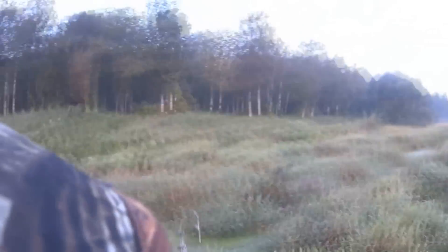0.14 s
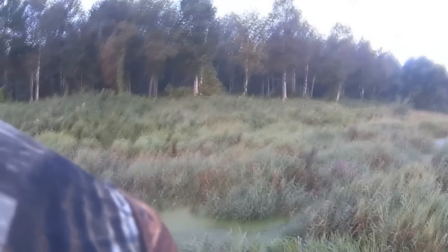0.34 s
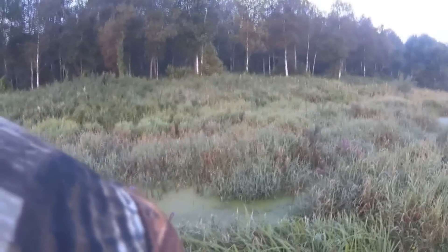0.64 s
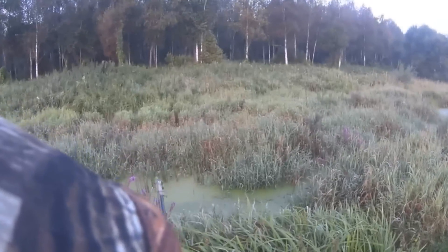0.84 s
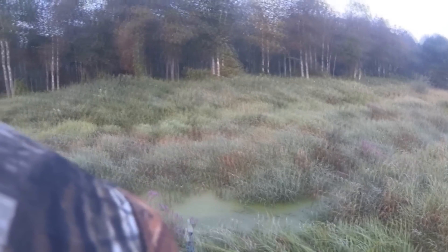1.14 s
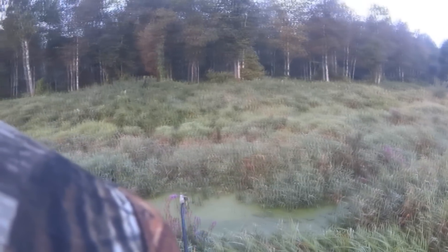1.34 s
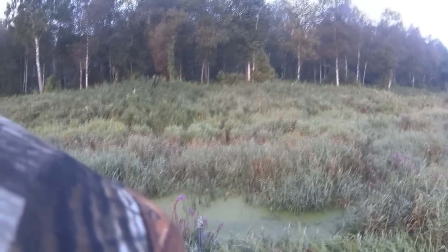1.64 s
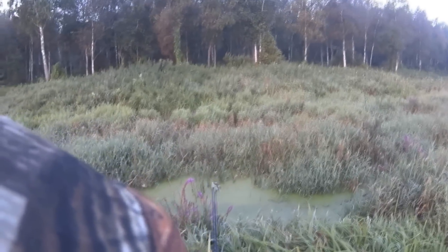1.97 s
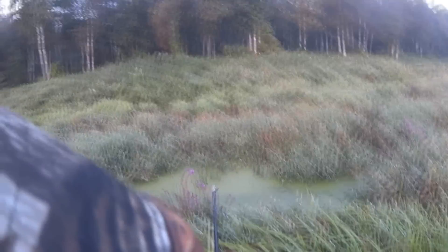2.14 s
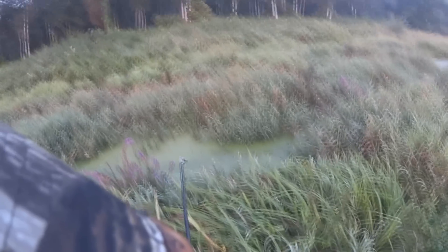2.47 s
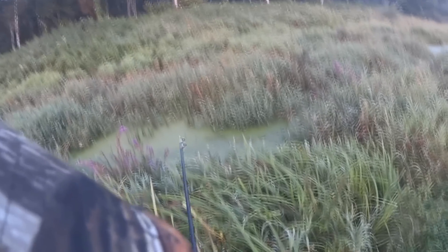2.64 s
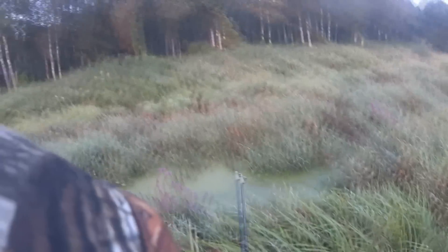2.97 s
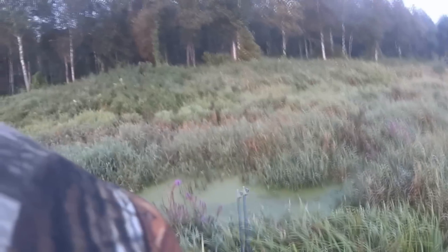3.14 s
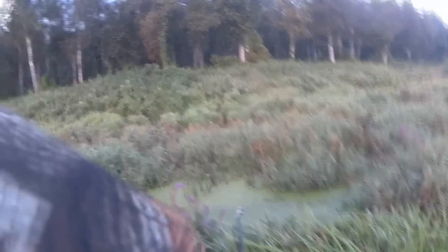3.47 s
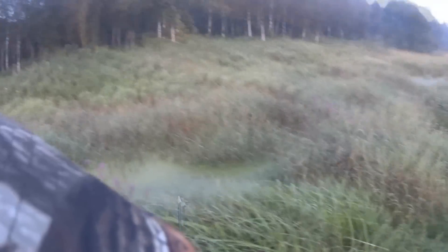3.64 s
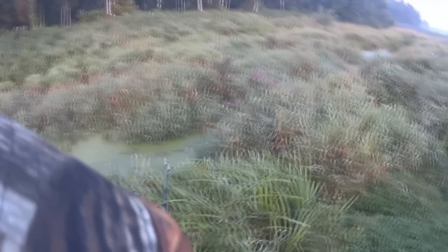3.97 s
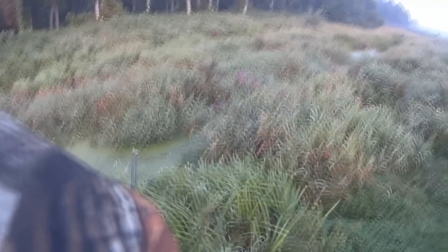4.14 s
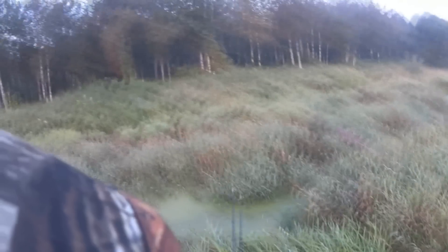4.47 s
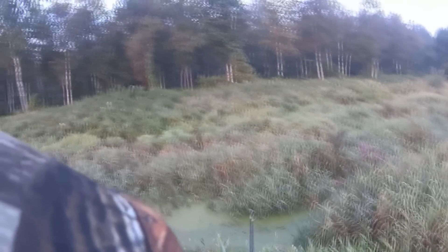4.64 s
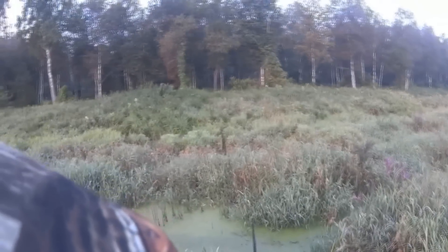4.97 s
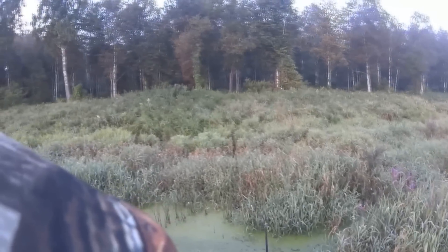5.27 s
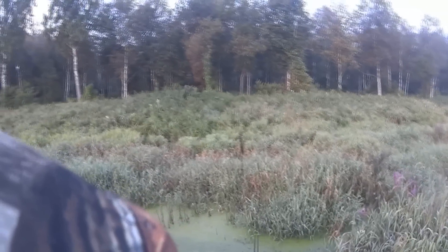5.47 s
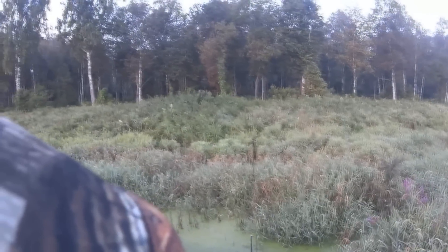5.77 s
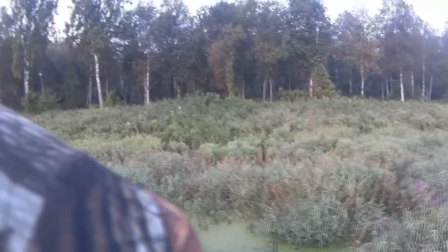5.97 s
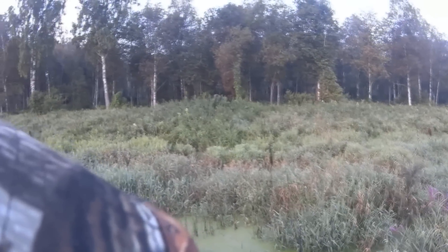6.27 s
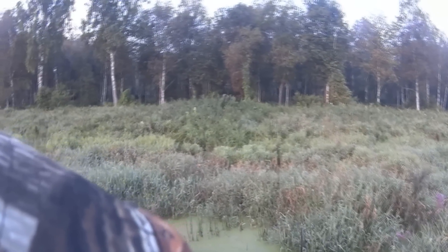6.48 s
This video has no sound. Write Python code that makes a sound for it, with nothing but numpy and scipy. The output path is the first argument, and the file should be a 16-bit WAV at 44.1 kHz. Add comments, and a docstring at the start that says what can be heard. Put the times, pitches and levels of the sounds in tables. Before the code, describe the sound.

Dry cloth and tall grass rub close against a small body camera in short irregular swishes, with sharp snaps and faint squeaks over a quiet outdoor hush.

```python
"""Someone shifts about in tall marsh grass, wearing a small camera. From the start, shaped noise gives the hush
of open country, with low buffeting of air; stick-slip friction of cloth and blades creeps faintly on the case.
From half a second on, short strokes swell this rustle, with decaying snaps, modal knocks and slow shoves of air.
Gliding tones make thin squeaks from about 3 s; coloured slips make the case groan under heavy drags from 4 s.
The rubbing is firmer from then on, and strokes go on until shortly before the end."""
import sys
import numpy as np
from scipy import signal
from scipy.fft import rfft, irfft
from scipy.io import wavfile
from scipy.ndimage import uniform_filter1d

SR = 44100
rng = np.random.default_rng(int(sys.argv[2]) if len(sys.argv) > 2 else 0)


def master(y):
    """Save y as 16-bit WAV."""
    cut = np.clip(np.atleast_2d(y).T, -1, 1)
    pcm = np.round(cut * 32767)  # scale
    wavfile.write(sys.argv[1], SR, pcm.astype(np.int16))


N = 291475  # length in samples


def amp(db):
    """Decibel law: level to amplitude."""
    return 10 ** (np.asarray(db) / 20)


def evened(x):
    """Normalisation to an rms of 1."""
    return x / np.sqrt(np.mean(x ** 2) + 1e-20)


def read(points, hz):
    """Interpolation of a spectrum table on a log-frequency axis."""
    f, value = np.transpose(points)
    return np.interp(np.log(hz + 1), np.log(f + 1), value)


def follow(rows):
    """Linear interpolation in time: the columns of a curve table, sample by sample."""
    s, *columns = np.transpose(rows)
    return [np.interp(np.arange(N) / SR, s, c) for c in columns]


def bins(size):
    """Frequencies in Hz of a real Fourier transform."""
    return np.fft.rfftfreq(size, 1 / SR)


def add(mix, s, sound):
    """Superposition: a sound is added to the mix from s seconds on."""
    part = mix[max(round(s * SR), 0):][:len(sound)]
    part += sound[:len(part)]


def wander(size):
    """Low-passed noise: smooth chance of rms 1 that changes over size samples."""
    noise = rng.standard_normal(N)
    return evened(uniform_filter1d(uniform_filter1d(noise, size), size))


def colour(x, db):
    """Minimum-phase filtering with the gain db(Hz): clicks ring after they start, never before."""
    size = 2048
    hz = abs(np.fft.fftfreq(size, 1 / SR))
    log_gain = np.log(amp(np.maximum(db(hz), -100)))
    # the Hilbert transform of the log gain gives the minimum phase
    taps = np.fft.ifft(np.exp(np.conj(signal.hilbert(log_gain)))).real
    return signal.fftconvolve(x, taps[None], axes=1)[:, :x.shape[1]]


def noise_pair(spectrum):
    """Spectral shaping: two unrelated noises with the given spectrum."""
    return irfft(rfft(rng.standard_normal((2, N))) * amp(read(spectrum, bins(N))), N)


def ports(pair, same, lead, balance):
    """Interaural-style coherence: two unrelated signals become the partly alike sound at the two ports."""
    hz, (a, b) = bins(N), rfft(pair)
    likeness = np.clip(read(same, hz), -1, 1)
    side = amp(read(balance, hz) / 2)
    right = likeness * a + np.sqrt(1 - likeness ** 2) * b
    right = right * np.exp(-1j * read(lead, hz))
    return irfft(np.array([a * side, right / side]), N)


# Likeness of the two ports for near sounds. Each row: frequency in Hz, likeness from 0 to 1.
NEAR_SAME = [(400, .6), (1400, .7), (2050, .97), (2300, .9), (2600, .58), (3200, .83), (3900, .8),
             (5000, .96), (6200, .91), (6900, .7), (7500, .85), (10500, .83)]
# Level of left over right for near sounds. Each row: frequency in Hz, difference in dB.
NEAR_BALANCE = [(1900, 0), (2350, 3), (3000, -1), (4000, -3), (4350, 2), (6300, -1), (7000, 4), (8200, -14),
                (8900, 1.5), (9350, 0.5), (10200, -3)]
# Phase lead of left for near sounds. Each row: frequency in Hz, lead in radians.
NEAR_LEAD = [(500, -2.8), (1050, -2.4), (1450, -.3), (2200, -.25), (2550, -.7), (3200, -.1), (4300, .1),
             (6200, -.35), (9200, -.6), (9800, -.1)]


def near_ports(pair):
    """Near-field reception: likeness, level and phase between the ports vary with frequency."""
    return ports(pair, NEAR_SAME, NEAR_LEAD, NEAR_BALANCE)


# Resonances of the case and the dips between them. Each row: frequency in Hz, width in Hz, lift in dB.
CASE = [(550, 270, 1), (815, 81, 4.5), (1230, 54, 11), (1784, 42, 15.5), (1805, 130, -16), (2260, 37, 2),
        (2430, 29, -4), (2820, 30, -6.5), (3240, 68, -7.5), (3987, 113, 8), (4310, 150, 18),
        (4300, 130, -22.5), (6000, 50, 7.5), (7500, 400, 0), (10100, 230, -1)]


def case_db(hz):
    """Resonance: each mode of the case lifts or dips the spectrum in dB by a bell-shaped curve."""
    return sum(db / (1 + (2 * (hz - f) / width) ** 2) for f, width, db in CASE)


# Spectrum of the hush. Each row: frequency in Hz, relative density in dB per Hz.
HUSH = [(53, -27), (90, -9), (246, -2.5), (659, -1), (1180, -3.5), (1700, -3), (1910, -5), (3710, -10.5),
        (4020, -22), (4280, -7.5), (5440, -17.5), (6020, -10), (7660, -16), (11000, -20.5), (14300, -57.5),
        (22000, -120)]
# Correlation of the hush at the two ports. Each row: frequency in Hz, likeness from -1 to 1.
HUSH_SAME = [(60, -0.22), (120, 0.79), (220, -0.085), (430, -0.38), (840, -0.66), (1620, -0.4),
             (3120, -0.32), (6040, -0.56), (11700, -0.35)]
HUSH_DB = -58


def hush():
    """Diffuse-field noise: distant air over the marsh and the faint hiss of the microphone."""
    heard = ports(noise_pair(HUSH), HUSH_SAME, lead=[(0, 0)], balance=[(0, 0)])
    return amp(HUSH_DB + 0.57 * wander(size=4000)) * evened(heard)


# Strokes of cloth and blades across the case. Each row: moment of fastest sliding in seconds, speeding up
# in seconds, slowing down in seconds, scrape level in dB, case ring and fizz in dB relative to the scrape.
STROKES = [ (.556, .09, .023, -62, 11.5, -14), (.719, 0.087, .06, -43, -2.5, -11.5),
           (.766, 0.065, 0.063, -39, -0.5, -4.5), (0.841, 0.043, 0.041, -39.5, -8, -7),
           (.901, 0.043, .028, -44.5, -10, -7.5), (.939, .02, .035, -47.5, -13, -7.5),
           (1.046, 0.036, 0.069, -47, -6, -6), (1.115, 0.025, 0.078, -46, -4, -7),
           (1.2, .018, 0.056, -48.5, -10, -5), (1.3, 0.072, 0.08, -39, -10.5, -5.5),
           (1.371, 0.043, 0.11, -41, -6.5, -7), (1.488, 0.046, 0.048, -46.5, 2, -12.5),
           (1.76, 0.078, 0.048, -49, 0.5, -4.5), (1.835, 0.089, .125, -40.5, -3, -8),
           (1.925, 0.022, 0.078, -48, 3.5, -5), (2.1, 0.049, 0.097, -45.5, -0.5, -11),
           (2.207, .015, 0.024, -58, 4, -2.5), (2.271, .021, 0.047, -45, -1.5, -8.5),
           (2.367, .1, 0.13, -45, -2, -10), (2.955, 0.014, .06, -62, 8.5, -8),
           (3.206, 0.076, 0.077, -45.5, -6, -7.5), (3.263, .042, .065, -39, -9.5, -13),
           (3.342, 0.068, 0.058, -51, -7, -9), (3.402, 0.049, .037, -44.5, -9.5, -9.5),
           (3.543, 0.04, 0.037, -35.5, -6.5, -10), (3.935, .044, .02, -63, 6, -8),
           (4.114, 0.057, .05, -50, 3, -9), (4.18, 0.079, 0.15, -43, 2, -10),
           (4.292, 0.14, 0.11, -40, 1, -10), (4.864, .085, 0.082, -38, 0, -11),
           (4.925, .09, 0.055, -36.5, -4, -8), (5.028, 0.12, 0.13, -34.5, -1.5, -7),
           (5.683, 0.066, .07, -48, -0.5, -6), (5.716, .05, .04, -41.5, 4.5, -6),
           (5.815, 0.021, 0.031, -49, 5.5, -5.5), (6.108, 0.031, 0.026, -42, 3.5, -9),
           (6.42, 0.081, 0.11, -54, 7, -6.5), (6.487, .043, 0.067, -49.5, 7.5, -8),
           (6.578, .075, .11, -42, 5, -8.5)]
# Faint creep of the cloth between strokes. Each row: time in seconds, scrape level in dB.
CREEP = [(0, -61), (.12, -74), (.35, -77), (.47, -62.5), (.65, -67), (1.0, -73.5), (2.02, -68.5),
         (2.47, -63.5), (2.75, -62), (3.05, -75.5), (3.62, -75.5), (3.85, -64), (4.57, -66.5), (4.68, -59),
         (5.27, -70), (5.39, -59.5), (5.55, -68.5), (5.87, -67), (6.17, -66), (6.3, -75.5)]
CREEP_RING_DB, CREEP_FIZZ_DB = 1.7, -3.5  # relative to the scrape
SPEED_LAW = 2.05  # the rustle grows as this power of the sliding speed


def sliding():
    """Power law of friction noise: strokes arch in speed over the creep, driving scrape, ring and fizz."""
    t = np.arange(N) / SR
    creep_db = follow(CREEP)[0] + np.array([[0], [CREEP_RING_DB], [CREEP_FIZZ_DB]])
    power = amp(creep_db) ** 2
    for s, rise_s, fall_s, db, ring_db, fizz_db in STROKES:
        on = (t > s - rise_s) & (t < s + fall_s)
        phase = np.interp(t[on], [s - rise_s, s, s + fall_s], [-1, 0, 1])
        speed = np.cos(np.pi / 2 * phase)
        peak = amp(db + np.array([[0], [ring_db], [fizz_db]]))
        power[:, on] += (peak * speed ** SPEED_LAW) ** 2
    return np.sqrt(power)


# Spectrum of the buffeting. Each row: frequency in Hz, relative density in dB per Hz.
BUFFET_COLOUR = [(5, 2.5), (15, -0.5), (30, -0.5), (65, -8), (100, -15.5), (200, -39), (600, -85)]
# at rest, and added by a lasting scrape of 0 dB; the stir is averaged over the linger time
BUFFET_REST_DB, BUFFET_STIR_DB, BUFFET_LINGER_S = -69.5, -34, 0.22


def buffet(unlike=0.16):
    """Pressure fluctuation: low lumps of air, nearly alike at both ports, swell around the strokes."""
    shared, own = noise_pair(BUFFET_COLOUR)
    stir = uniform_filter1d(sliding()[0], max(round(BUFFET_LINGER_S * SR), 1))
    level = amp(BUFFET_REST_DB) + amp(BUFFET_STIR_DB) * stir
    return level * evened(shared + unlike * np.array([own, -own]))


# How firmly the cloth presses. Each row: time in seconds, share of firm rub from 0 to 1.
PRESSURE = [(0, 0.04), (3.6, 0.83), (4.0, 0.95), (6.6, 1)]


def firmness():
    """Contact pressure: the share of firm rub against light swish, from 0 to 1."""
    return np.clip(follow(PRESSURE)[0], 0, 1)


def slips(per_s, spread_db, smooth, clump_db, smear_s=0.0041, count=6):
    """Stick-slip: fibres let go in uneven clumps over a smooth sliding hiss."""
    size = amp(spread_db * np.minimum(rng.exponential(1, N), 4)) * (rng.random(N) < per_s / SR)
    clicks = size * rng.choice([-1, 1], (2, N))
    place = rng.integers(0, count, N)
    t = np.arange(1024) / SR
    # from each of a few places on the cloth a slip arrives smeared in time, its spectrum unchanged
    paths = rfft(rng.standard_normal((count, len(t))) * amp(-60 * t / smear_s))
    paths = np.roll(irfft(paths / abs(paths)), len(t) // 8, axis=1)
    grains = np.zeros((2, N))
    for k, path in enumerate(paths):
        grains += signal.oaconvolve(clicks * (place == k), path[None], axes=1)[:, :N]
    hiss = smooth * rng.standard_normal((2, N))
    return (evened(grains) + hiss) * amp(clump_db * wander(size=200))


def shifting(pair, patchy_db):
    """Time-varying filtering: the contact point moves, so narrow resonances come and go."""
    z = signal.stft(pair, nperseg=512, noverlap=384)[2]
    patches = rng.standard_normal(z.shape[1:])
    patches = uniform_filter1d(patches, size=3, axis=0)  # across frequency
    patches = evened(uniform_filter1d(patches, size=18, axis=1))  # across time
    return signal.istft(z * amp(patchy_db * patches), nperseg=512, noverlap=384)[1][:, :N]


# Colour of a light swish. Each row: frequency in Hz, relative density in dB per Hz.
SWISH = [(650, -57), (1100, -48), (1180, -16.5), (1330, -20), (1650, -0.5), (2270, -2), (2910, -7),
         (3920, -0.5), (4620, -30.5), (5040, -0.5), (6050, -3.5), (6600, -7), (8990, -23), (10100, -12.5),
         (11000, -26.5), (14300, -79), (22000, -120)]
# Colour of a firmer rub. Each row: frequency in Hz, relative density in dB per Hz.
RUB = [(650, -59), (1100, -26.5), (1650, -8.5), (1800, -7.5), (2220, -3.5), (2860, -2.5), (3460, -2.5),
       (3920, -10), (4280, -0.5), (6050, -8), (6670, -12), (7270, -8.5), (7930, -19.5), (10300, -11.5),
       (11000, -19), (14300, -70), (22000, -120)]
JUDDER_DB, JUDDER_S = 1.2, 0.0074  # the slide is never quite even


def rustle():
    """Friction-driven resonance: the same slips feed case ring, scrape and fizz; strokes set how strongly."""
    judder = amp(JUDDER_DB * wander(size=max(round(JUDDER_S * SR), 1)))
    scrape_gain, ring_gain, fizz_gain = sliding() * judder
    # a light touch crackles; pressed cloth slides evenly
    loose = slips(per_s=1200, spread_db=2.0, smooth=0.58, clump_db=2.0, smear_s=0.0031)
    dense = slips(per_s=4000, spread_db=2.5, smooth=1.0, clump_db=0.53, smear_s=0.0034)
    loose = shifting(loose, patchy_db=5.0)
    dense = shifting(dense, patchy_db=2.8)
    swish = evened(colour(loose, lambda hz: read(SWISH, np.maximum(hz, 1200)) + case_db(hz)))
    rub = evened(colour(dense, lambda hz: read(RUB, np.maximum(hz, 1150)) + case_db(hz)))
    firm = firmness()
    z = rfft(near_ports(np.sqrt(1 - firm) * swish + np.sqrt(firm) * rub))
    hz = bins(N)
    low = 1 / (1 + (hz / 2800) ** 20)
    high = 1 - 1 / (1 + (hz / 7000) ** 20)
    # small things radiate little bass
    thin = amp(read([(100, -37), (400, -2), (800, -2), (1200, -0.5), (1550, 2.0), (1950, 9.0)], hz))
    bands = (low * thin, 1 - low - high, high)
    ring, scrape, fizz = (evened(irfft(z * band, N)) for band in bands)
    return ring_gain * ring + scrape_gain * scrape + fizz_gain * fizz


CATCHES_PER_S, CATCH_SPREAD_DB = 90, 3.5
CATCH_DB = -10.5  # relative to the scrape, at the lightest touch
CATCH_LOW_HZ = 4260  # the ticks thin out below this


def catches():
    """Impulsive noise: chance ticks, too light to ring the case, follow the scrape, fainter when pressed."""
    size = amp(CATCH_SPREAD_DB * np.minimum(rng.exponential(1, N), 3))
    size = size * (rng.random(N) < CATCHES_PER_S / SR)
    clicks = size * rng.choice([-1, 1], (2, N))
    ticks = colour(clicks, lambda hz: read(SWISH, hz) - 20 * np.log10(1 + (CATCH_LOW_HZ / (hz + 1)) ** 4))
    light = 1 - .5 * firmness()
    return amp(CATCH_DB) * light * sliding()[0] * evened(near_ports(ticks))


STRANDS_PER_S, STRAND_S = 36, 0.043  # mean length in seconds
STRAND_GLIDE = 0.142  # range of the pitch change from start to end, as a share of the pitch
STRAND_DB = -14  # relative to the scrape, under full pressure
STRAND_LOW_HZ, STRAND_HIGH_HZ = 1900, 5620


def strands():
    """Frequency glide: single threads sing briefly, up or down, stronger with pressure and scrape."""
    out = np.zeros(N)
    for place, pitch, glide, size in rng.random((round(STRANDS_PER_S * N / SR), 4)):
        u = np.linspace(-1, 1, round(STRAND_S * (.5 + size) * SR))
        middle_hz = STRAND_LOW_HZ * (STRAND_HIGH_HZ / STRAND_LOW_HZ) ** pitch
        hz = middle_hz * (1 + STRAND_GLIDE * (glide - .5) * u)
        tone = np.sin(2 * np.pi * np.cumsum(hz) / SR)
        add(out, place * N / SR, size * (1 - u ** 2) * tone)
    return amp(STRAND_DB) * firmness() * sliding()[0] * evened(out)


# Snaps where something catches. Each row: start in seconds, level in dB, case ring (lift below about 2900 Hz)
# in dB, die-away time t60 in seconds.
SNAPS = [(0.4758, -34, -3, .02), (0.482, -30.5, 9, 0.027), (0.533, -35.5, 9, 0.027), (0.547, -35, -9, .057),
         (0.5905, -40.5, 14, 0.042), (0.831, -22.5, -12, 0.029), (0.847, -32, -26, 0.014),
         (0.931, -43, -15, .035), (1.035, -26.5, -12, 0.044), (1.101, -42, 9, 0.023),
         (1.192, -34, -38, 0.051), (1.249, -36.5, 5, 0.079), (1.355, -25.5, -18, 0.035),
         (1.394, -31, -11, .02), (1.47, -36.5, -3, .07), (1.746, -39, 18, .03), (2.074, -38.5, -13, 0.034),
         (2.266, -40, 4.5, .035), (2.4097, -17.5, 3, 0.065), (2.412, -16, 2, 0.026),
         (2.4425, -38.5, -32, 0.0087), (3.243, -30.5, -10, 0.02), (3.832, -49, -22, .006),
         (3.94, -38, -7, 0.0049), (4.13, -33, -33, 0.0086), (4.169, -31, -6, 0.015), (4.815, -42, 9, 0.07),
         (4.956, -25, 2, 0.0093), (5.192, -48, 6, .017), (6.191, -45.5, 15, 0.084), (6.390, -37, 8, 0.047),
         (6.423, -39, 14, 0.04)]
# Spectrum of a snap. Each row: frequency in Hz, relative density in dB per Hz.
SNAP_COLOUR = [(240, -74), (400, -50), (1030, -23), (1160, -30), (1790, -10), (2170, 0), (2670, -10),
               (2910, -3.5), (3580, -11), (4110, -7.5), (4400, -8.5), (6060, -9.5), (8340, -21.5),
               (11000, -21.5), (14300, -63), (22000, -120)]
CLEAN_S = .032  # the click's share of the energy falls e-fold for each such step of t60


def snaps():
    """Impulse response: a fold or stalk lets go as one click and a decaying scatter of slips."""
    t, dry = np.arange(SR // 8) / SR, np.zeros((N, 2))
    packed = .0015 * SR  # a level counts the energy as if packed in 1.5 ms
    for s, db, ring_db, t60 in SNAPS:
        scatter = rng.standard_normal((2, len(t))) * amp(-60 * t / t60)
        clean = np.exp(-abs(t60 / CLEAN_S))
        burst = np.sqrt(1 - clean) * scatter / np.linalg.norm(scatter[0])
        burst[0, 0] = np.sqrt(clean)
        burst = colour(burst, lambda hz: read(SNAP_COLOUR, hz) + case_db(hz) + ring_db / (1 + (hz / 2900) ** 8))
        loudness = np.sqrt(np.sum(burst[0] ** 2) / packed)
        add(dry, s, (amp(db) * burst / loudness).T)
    return near_ports(dry.T)


# Low modes of the case on its mount. Each row: frequency in Hz, relative level in dB, t60 in seconds.
MOUNT = [(251, -19, 0.04), (494, -3, 0.085), (635, -15, 0.046), (1206, 19.5, 0.059)]
# Knocks on the case. Each row: start in seconds, level in dB, hardness of the blow as its cut-off in Hz.
KNOCKS = [(0.478, -52, 774), (0.548, -60.5, 900), (0.831, -55.5, 870), (1.877, -43.5, 450),
          (2.414, -52, 1310)]


def knocks():
    """Modal excitation: a blow rings the low modes of the case; a softer one excites the high ones less."""
    t, out = np.arange(SR // 5) / SR, np.zeros(N)
    for s, db, hard_hz in KNOCKS:
        ring = np.zeros(len(t))
        for hz, mode_db, t60 in MOUNT:
            excitation = 1 / (1 + (hz / hard_hz) ** 4)
            ring += excitation * amp(mode_db - 60 * t / t60) * np.sin(2 * np.pi * hz * t)
        add(out, s, amp(db) * ring)
    return out


# Shoves of air as the body moves. Each row: centre in seconds, level in dB, swing in Hz.
SHOVES = [(0.769, -58, 75), (0.96, -59, 64.8), (1.759, -56.5, 74), (3.961, -55, 65), (4.247, -59.5, 102.6),
          (5.484, -46, 35), (5.528, -50, 62), (5.584, -55, 50), (6.461, -61, 68)]


def shoves():
    """Pressure pulse: a sine under a Gaussian envelope gives one push and pull each."""
    t, out = np.arange(N) / SR, np.zeros(N)
    for s, db, hz in SHOVES:
        cycles = hz * (t - s)
        out += amp(db) * np.sin(2 * np.pi * cycles) * np.exp(-cycles ** 2)
    return out


# Thin squeaks. Each row: start in seconds, length in seconds, first pitch in Hz, last pitch in Hz,
# level midway between the ports in dB.
SQUEAKS = [(2.941, 0.031, 2040, 2076, -52), (4.093, 0.079, 2390, 2410, -54),
           (4.136, 0.048, 4900, 4250, -50), (4.146, 0.034, 1340, 1450, -53), (4.16, 0.03, 2346, 2430, -33),
           (4.209, .06, 2700, 2800, -45), (4.274, .037, 2346, 2190, -43), (4.845, 0.015, 2210, 1980, -36),
           (4.885, 0.036, 1535, 1700, -54), (4.96, 0.044, 4250, 4320, -41),
           (4.978, 0.029, 1970, 1840, -39.5), (5.01, .052, 1816, 1245, -48.5),
           (5.004, 0.05, 2640, 2790, -43), (5.049, 0.034, 2308, 2165, -32), (5.448, 0.02, 1830, 1730, -53),
           (5.476, 0.01, 1850, 1900, -45), (5.478, 0.0085, 1430, 1330, -55.5),
           (6.461, 0.051, 2800, 3120, -41.5), (6.545, 0.031, 3930, 4420, -43.5),
           (6.557, 0.047, 2288, 2380, -38.5)]


def squeaks(rough=0.3, waver=.011):
    """Periodic stick-slip: for a moment the slips fall in step as a rough, gliding whistle."""
    out, jitter, flutter = np.zeros(N), wander(size=30), wander(size=70)
    for s, length, first_hz, last_hz, db in SQUEAKS:
        at = round(s * SR) + np.arange(round(length * SR))
        at = at[at < N]
        hz = np.linspace(first_hz, last_hz, len(at)) * (1 + waver * jitter[at])
        tone = evened(np.sin(2 * np.pi * np.cumsum(hz) / SR) * (1 + rough * flutter[at]))
        add(out, s, amp(db) * tone * signal.windows.tukey(len(at), .7))
    return out * amp([[1.2], [-1.2]])  # louder at the left port


# Spectrum of the groan. Each row: frequency in Hz, relative density in dB per Hz.
GROAN = [(200, -23), (520, -7), (700, -6), (820, 6), (930, -11), (1060, -3), (1250, -4), (1550, -4),
         (2000, -19)]
# Heavy drags that make the case groan. Each row: start in seconds, end in seconds, level in dB.
DRAGS = [(4.057, 4.41, -59.5), (4.822, 4.952, -56.5), (4.955, 5.11, -60)]


def groan():
    """Forced vibration: under a heavy drag the case shudders unevenly and differently at each port."""
    shudder = slips(per_s=410, spread_db=-0.5, smooth=1.0, clump_db=3.0)
    noise = evened(colour(shudder, lambda hz: read(GROAN, hz)))
    level = np.zeros(N)
    for start, end, db in DRAGS:
        add(level, start, amp(db) * signal.windows.tukey(max(round((end - start) * SR), 1), .5))
    return level * noise


def scene():
    """Superposition of all sources at the two ports."""
    background = hush() + buffet()
    rubbing = rustle() + catches() + strands()
    return background + rubbing + snaps() + knocks() + shoves() + squeaks() + groan()


EDGE_HZ = 11150


def record(dry):
    """Band limiting: a low-pass filter gives the narrow band of a small camera."""
    taps = signal.firwin(401, EDGE_HZ, window=("kaiser", 8), fs=SR)
    return signal.oaconvolve(dry, taps[None], "same")


dry = scene()
out = record(dry)
master(out)
```